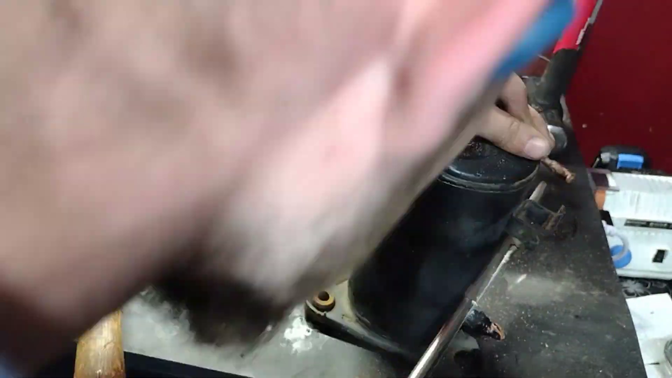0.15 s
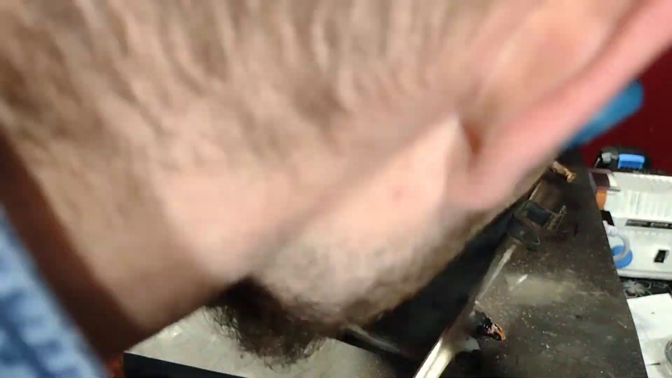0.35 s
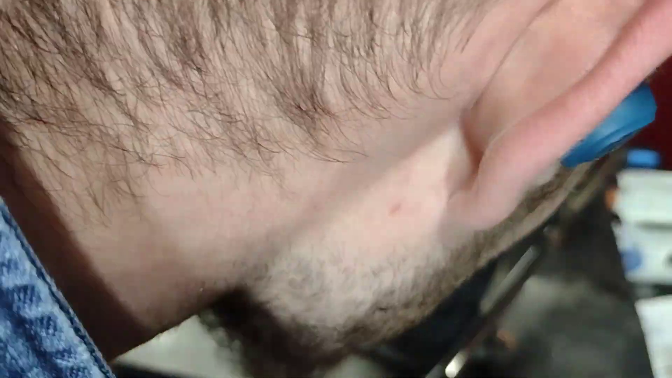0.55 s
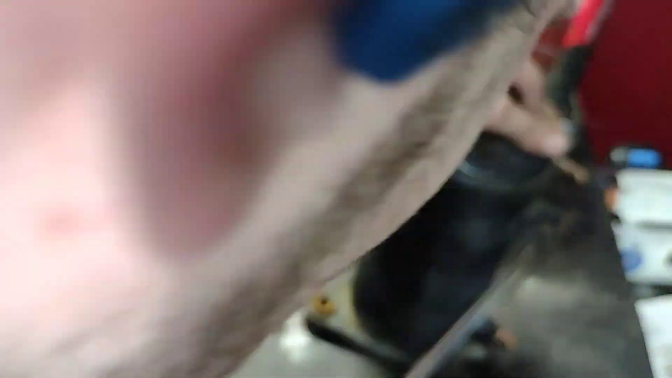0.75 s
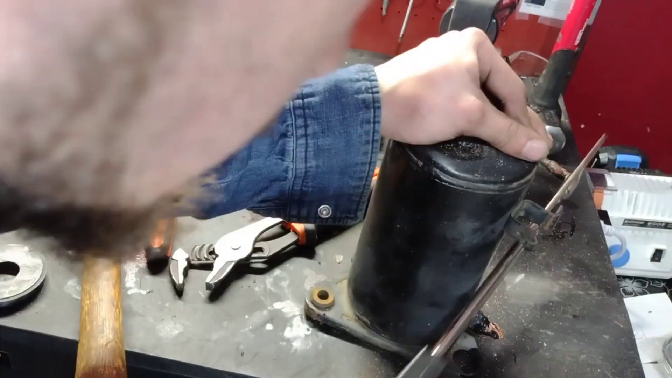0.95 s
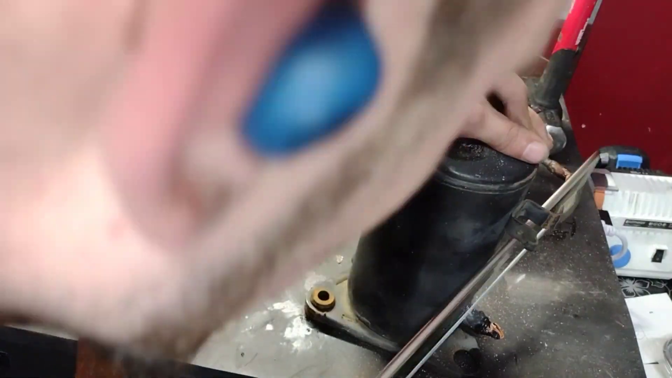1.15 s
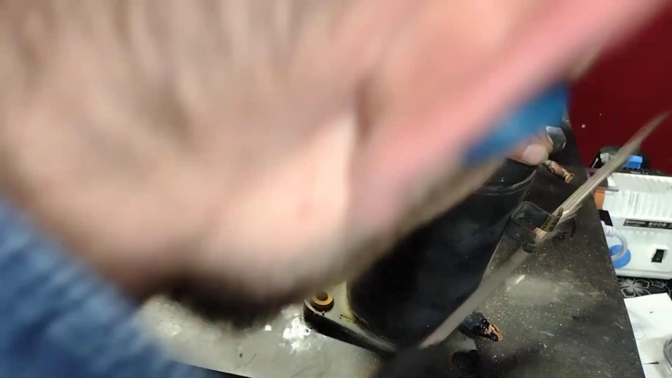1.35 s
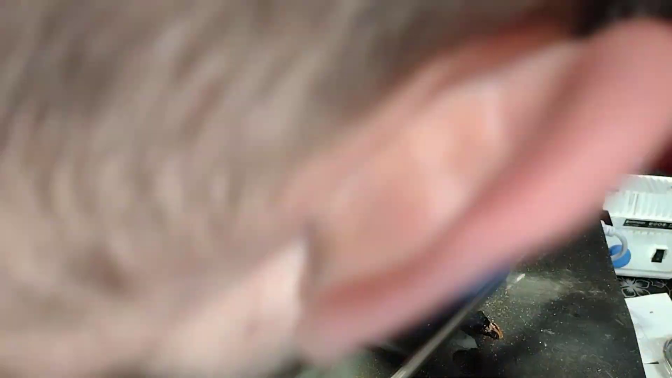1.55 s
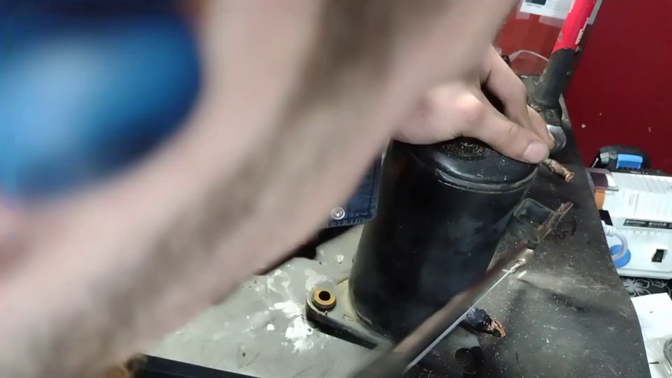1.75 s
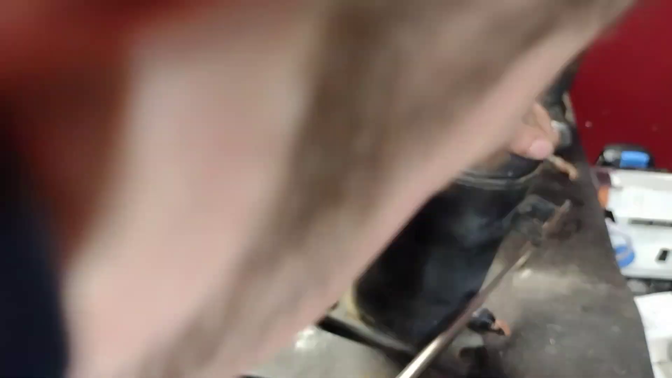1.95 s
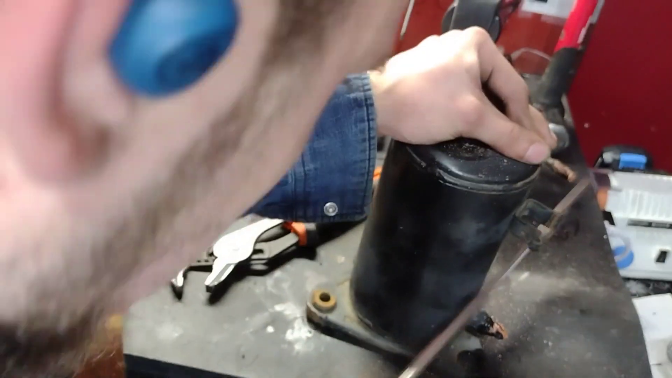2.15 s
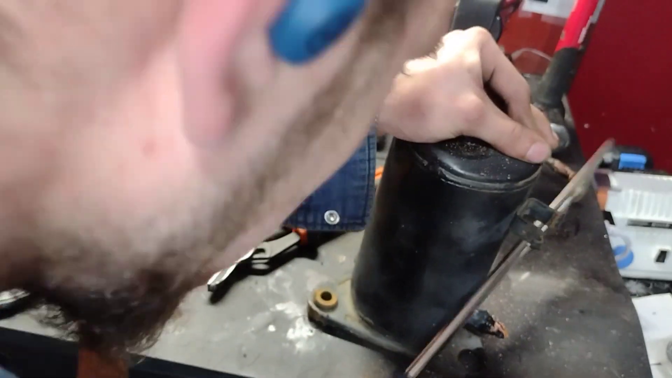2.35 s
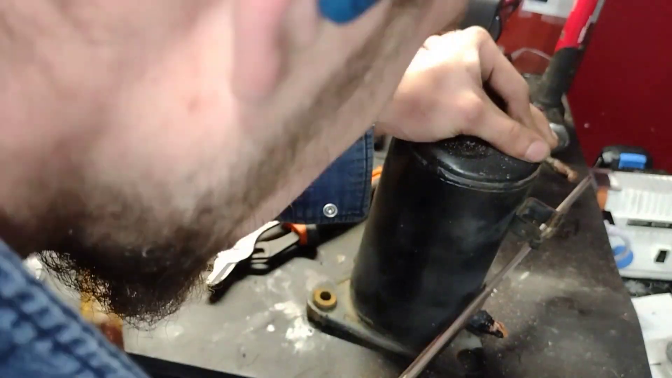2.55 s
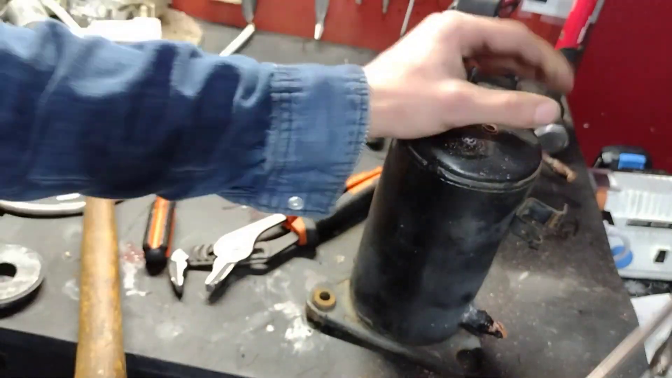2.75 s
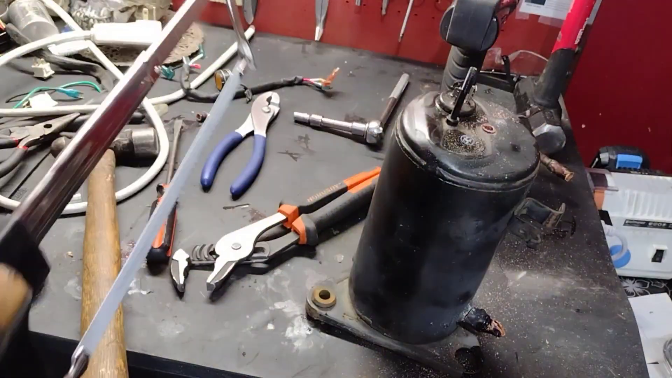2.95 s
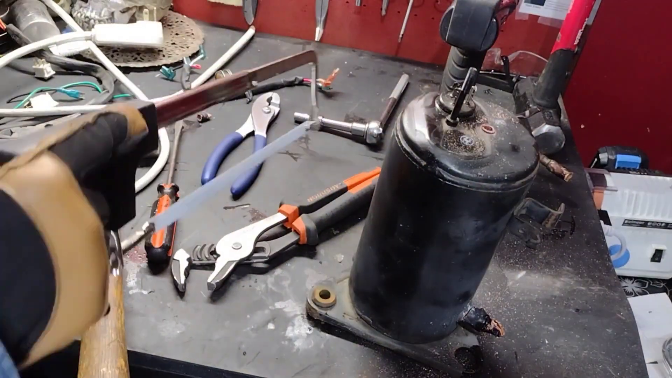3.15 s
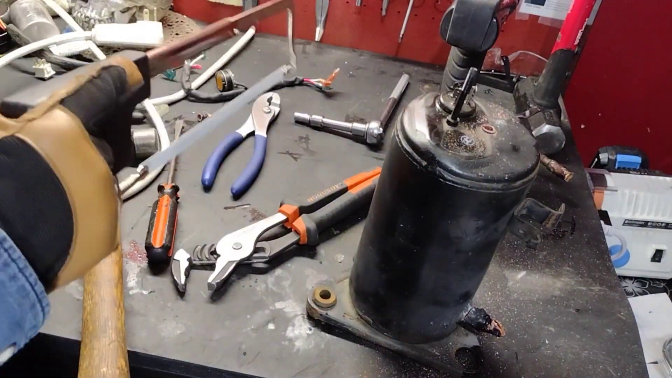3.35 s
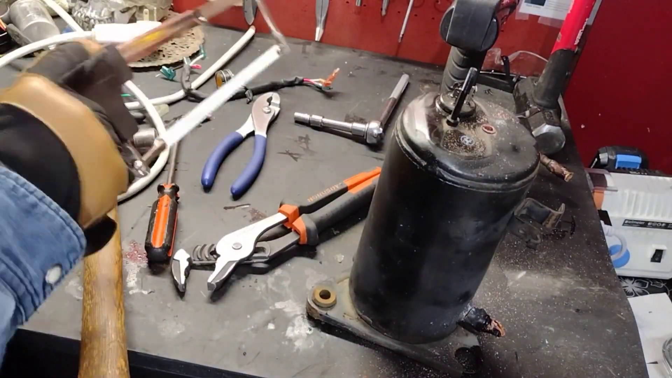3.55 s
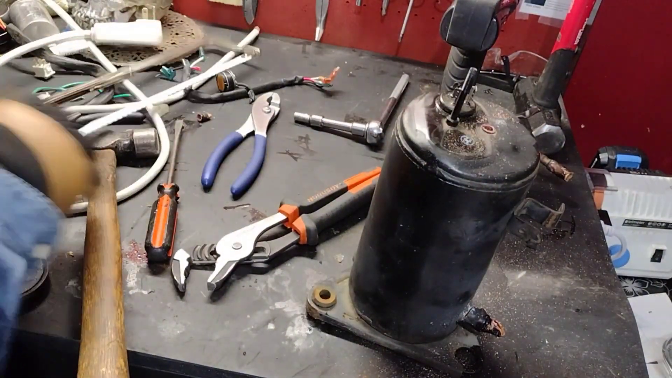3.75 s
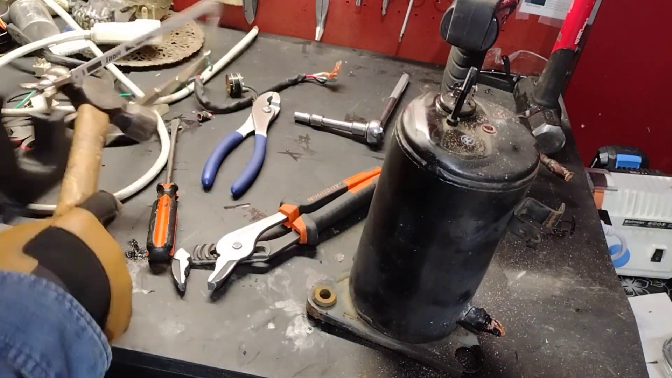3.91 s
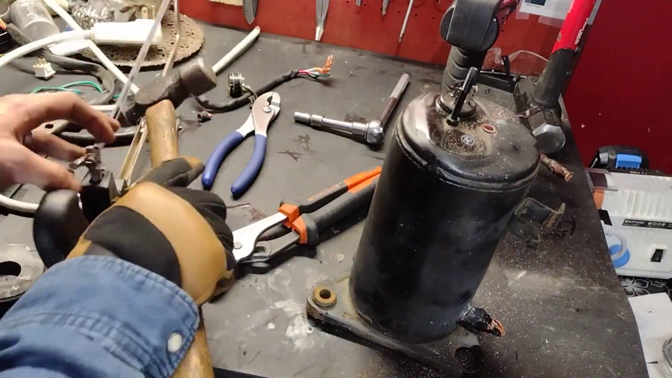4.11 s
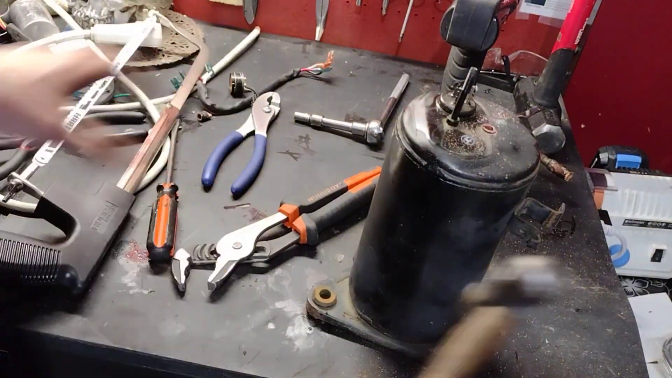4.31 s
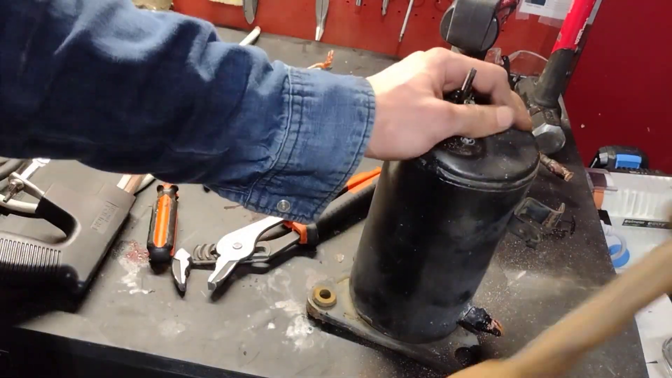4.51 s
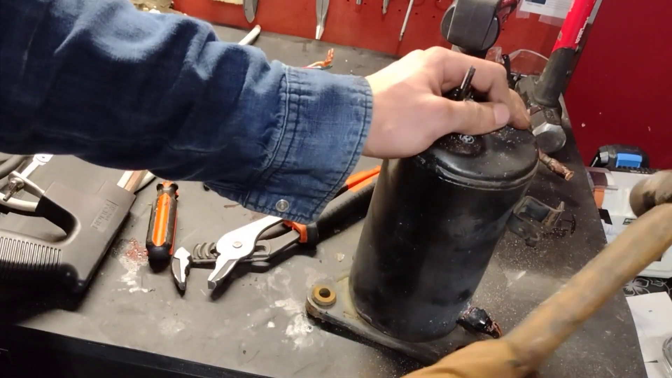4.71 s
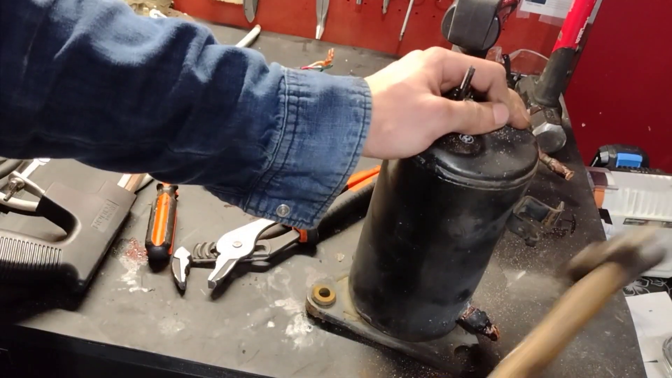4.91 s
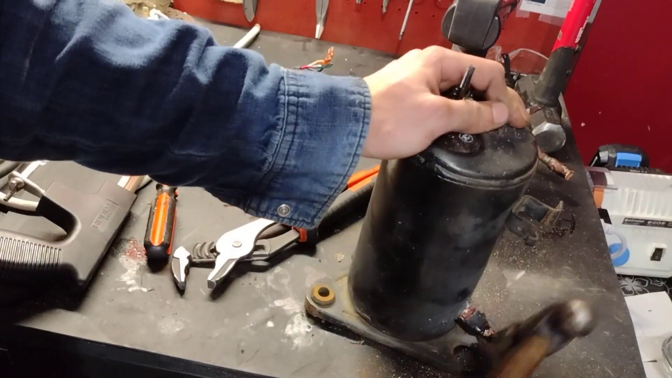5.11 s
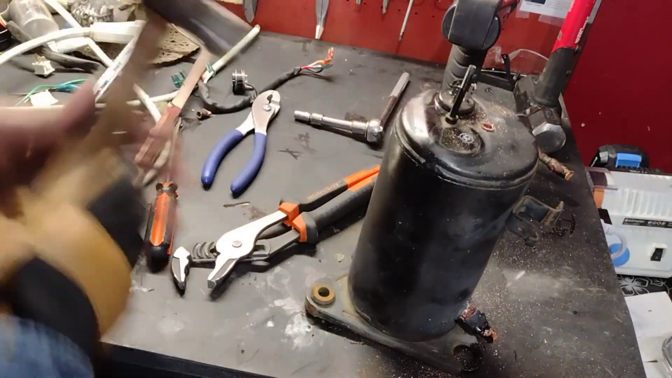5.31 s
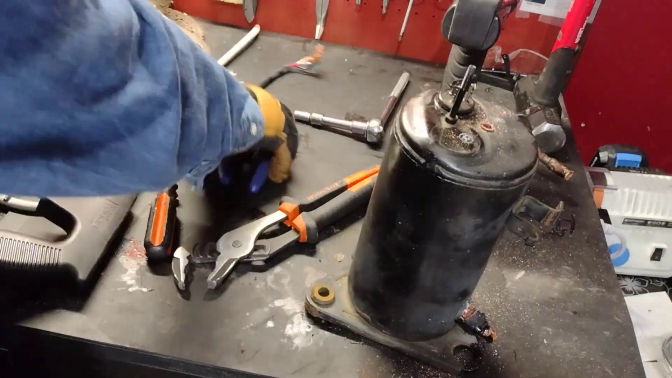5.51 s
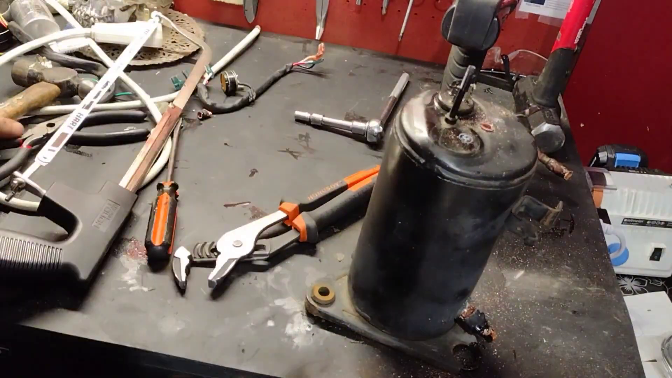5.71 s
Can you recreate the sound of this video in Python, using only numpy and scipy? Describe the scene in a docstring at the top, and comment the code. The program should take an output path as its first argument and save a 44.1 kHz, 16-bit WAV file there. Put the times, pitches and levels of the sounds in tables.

```python
"""A hacksaw chatters on the steel casing of a compressor; tools shift on the bench; a hammer raps six times.
Stick-slip friction and impacts excite the resonant modes of the steel, over occasional bass thumps.
The action is sped up, so each stroke or knock is a short snatch of sound that fades in and out.
Behind them the casing rings thinly, and hands and loose parts rustle in a faint shop hush."""
import sys
import numpy as np
from scipy import signal
from scipy.fft import rfft, irfft
from scipy.io import wavfile

SR = 44100
rng = np.random.default_rng(int(sys.argv[2]) if len(sys.argv) > 2 else 0)


def generate_wav(signal):
    """Clip the signal to [-1, 1] and save it as 16-bit WAV at the path in sys.argv[1]."""
    frames = np.transpose(np.atleast_2d(signal))
    scaled = np.clip(frames, -1, 1) * 32767
    pcm = np.round(scaled).astype(np.int16)
    wavfile.write(sys.argv[1], SR, pcm)


N = 254456

# Saw strokes: peak_s, level_db, rise_ms, fall_ms, weight_db (body over grind), pitch_hz (near 0: no tone)
SAW_STROKES = [(0.004, -16, 16, 11.8, -24, 2919), (0.012, -41, 9, 11, 11.5, 740),
               (0.027, -26, 1.5, 13, -17.5, 0), (0.037, -45.5, 11, 9, 13.5, 562),
               (0.109, -67.5, 14, 13, 18, 563.5), (0.141, -35.5, 9.5, 12.8, -18, 3463),
               (0.189, -64, 4.6, 12, 5, 729), (0.258, -29, 5.9, 11.1, -15, 3940),
               (0.349, -47.5, 9, 15.4, -5, 3477), (0.377, -54, 2, 9.4, -22, 3840),
               (0.531, -61, 7, 26, -5.5, 3736.5), (0.578, -61.5, 4, 9.9, 3, 3124),
               (0.685, -42.5, 10, 6.5, -1, 1445), (0.698, -42, 7, 41, -3, 516),
               (0.728, -19.5, 5.7, 9, -43, 0), (0.75, -29.5, 28.6, 11.5, -4, 460),
               (0.819, -29, 1.3, 3.3, -4, 3344), (0.829, -47, 2.3, 22, 3, 481),
               (0.858, -50, 4.5, 26.4, 0, 2960), (0.926, -57.5, 4.8, 22, -3.5, 3650),
               (1.033, -30.5, 11.1, 4.3, -8, 2601), (1.082, -36.5, 26, 19, -0.8, 0),
               (1.122, -23.5, 17.8, 5.4, -10, 2553), (1.147, -25.5, 14.6, 12.7, -9, 2870),
               (1.19, -19.5, 10.6, 4.3, -51, 2677), (1.231, -29.5, 37, 34, -2, 2945),
               (1.265, -29, 2, 14.3, -2.5, -0.5), (1.312, -24, 15.4, 7.6, -4, 0),
               (1.359, -25.5, 20.7, 6.3, -8.5, -0.5), (1.401, -32.5, 15.5, 9.2, 3.5, 651.5),
               (1.448, -27, 11.8, 15.4, -3.7, 657.5), (1.49, -23, 6.8, 12.4, 3, 646.5),
               (1.542, -25, 11.4, 8.4, -3, 2513.5), (1.581, -59, 21, 11, 22.5, 380.5),
               (1.637, -30.5, 7.6, 1.5, -3.5, 2744), (1.658, -42.5, 33, 3, -2, 5),
               (1.671, -58.5, 6.5, 13, 14.5, 359), (1.735, -66, 7.5, 21, 4.5, 423),
               (1.798, -30.5, 15, 27, 1, 1353.5), (1.822, -21.5, 5.1, 9.5, -15, 3038),
               (1.893, -31.5, 4.7, 27.4, 1, 3744.5), (1.954, -23.5, 5, 13.7, -1, 1.5),
               (1.999, -24, 12, 6.8, -5.5, 2521), (2.028, -22.5, 13, 17.5, 0.5, 0),
               (2.077, -23, 12, 6.4, -9, 662), (2.127, -30, 21.8, 27, -3, 0),
               (2.194, -23, 16.5, 7.4, -1, 0), (2.232, -33.5, 14, 9.1, -3, 1307.5),
               (2.254, -20, 7.3, 12.3, -2, 647), (2.288, -32.5, 41, 15.6, -5, -1.5),
               (2.331, -20.5, 11.8, 8.2, -1, 647.5), (2.353, -27.5, 9.2, 31.6, -7, 647.5),
               (2.375, -35.5, 8.5, 7.7, 13.5, 476), (2.397, -28, 10.5, 6.1, -3.5, 472),
               (2.416, -45.5, 11, 26, 13.5, 483.5), (2.457, -40.5, 2.8, 36, 3, 0),
               (2.478, -45, 2, 34, 4, 1.5), (2.512, -34.5, 5.6, 14.6, -1.5, 0),
               (2.61, -40.5, 11.6, 2.2, 0.8, 0), (2.629, -29, 10.7, 21, -12, 2),
               (2.665, -48.5, 13, 14, -7, 3782)]
# Resonances of blade and casing: centre_hz, width_hz, gain_db
SAW_RESONANCES = [(470.4, 20, -2.5), (695, 27, -1.5), (1376.4, 36, -1.5), (1750, 19, -20),
                  (2585, 59, -10.5), (3470, 57, -7.5), (4680, 76, -15), (4670, 630, -18),
                  (5230, 110, -17.5), (6780, 220, -17.5), (8700, 1100, -21)]
# Broad spectrum under those resonances: frequency_hz, density_db
SAW_SPECTRUM = [(24, -66.5), (40, -43.5), (185, -26.5), (270, -22), (600, -6.5), (1100, -17.5), (2600, -9),
                (4000, -15.5), (11000, -18.5), (15500, -16.5)]


def hacksaw():
    """Stick-slip friction: the teeth catch and release, driving the modes of blade and casing."""
    strokes = timbre(SAW_STROKES, thump_db=-20.5, thump_per_weight=1.0, thump_per_effort=-0.35,
                     hiss_db=-4, hiss_per_effort=0.23, low_tone_db=1.2, high_tone_db=-3.0)
    return contacts(strokes, SAW_RESONANCES, SAW_SPECTRUM, grit_db=2.5, lag_ms=0.42,
                    mode_db=-6.5, scatter_db=5.5, wobble_hz=22.5, crack_db=5.5)


# Hammer blows: peak_s, level_db, rise_ms, fall_ms, weight_db, pitch_hz
HAMMER_BLOWS = [(4.528, -37.5, 7.7, 13.4, 2.5, 5076), (4.63, -22.5, 2.4, 7.4, -3, -3.5),
                (4.74, -21.5, 2.14, 11.4, -0.8, -1), (4.854, -32, 7.4, 13.4, 8, 0),
                (4.974, -35, 12.2, 9.1, 7.5, 2633), (5.087, -42.5, 8.4, 12, 10.5, 2173.5)]
# Resonances of the struck casing: centre_hz, width_hz, gain_db
HAMMER_RESONANCES = [(148.8, 52, 12.5), (364, 85, -1), (1646, 64, 0.5), (2080, 150, -9), (2602, 87, 3),
                     (3100, 92, -11), (4270, 77, -11.5), (5170, 230, -13.5), (6596, 39, -14.5)]
# Broad spectrum of a blow: frequency_hz, density_db
HAMMER_SPECTRUM = [(18, -20.5), (60, 4.5), (145, -24), (400, 8.5), (1430, -11.5), (2600, -7), (7700, -25.5),
                   (16000, -35.5)]


def hammer():
    """Impact and rebound: each blow excites the casing, which settles on the bench with a dull knock."""
    blows = timbre(HAMMER_BLOWS, thump_db=2.2, thump_per_weight=0.05, thump_per_effort=-0.68,
                   hiss_db=-10.5, hiss_per_effort=-0.047, low_tone_db=-1.3, high_tone_db=4.2)
    delay_s, drop_db, edge_ms, weight_db = 0.023, 28.5, 14.7, 12
    settling = [(peak_s + delay_s, level_db - drop_db, edge_ms, edge_ms, weight_db, 0)
                for peak_s, level_db, *_ in HAMMER_BLOWS]
    rebounds = timbre(settling, thump_db=9.4, thump_per_weight=0, thump_per_effort=0.05,
                      hiss_db=-19, hiss_per_effort=0.1, low_tone_db=0, high_tone_db=0)
    return contacts([*blows, *rebounds], HAMMER_RESONANCES, HAMMER_SPECTRUM, grit_db=2.95, lag_ms=0.13,
                    mode_db=0, scatter_db=7.0, wobble_hz=12.0, crack_db=21.5)


# Knocks and scrapes of tools: peak_s, level_db, rise_ms, fall_ms, weight_db, pitch_hz
TOOL_KNOCKS = [(2.717, -80, 5.3, 13, 19.5, 756), (2.807, -68.5, 21, 34, 1.5, 424),
               (2.9, -68.5, 1.1, 1.9, -13, -11.5), (3.088, -75.5, 4.8, 12, 17, 597),
               (3.177, -66.5, 24.5, 3.4, 16.5, 463), (3.193, -61.5, 6.9, 11, 9.5, 572),
               (3.227, -62, 0.78, 2, 5, 0), (3.276, -69.5, 6.6, 13.6, 19, 356),
               (3.395, -64.5, 9, 4, 24, 446), (3.416, -58.5, 8.4, 11.5, 21, 318),
               (3.466, -59, 9.8, 8.7, 5, 2146), (3.495, -75.5, 9.5, 17, 20, 400),
               (3.631, -64.5, 11, 6, -1.2, 413), (3.654, -66.5, 10.7, 12, 5.5, 353.5),
               (3.719, -47.5, 9.6, 31.8, 6, 365), (3.75, -42.5, 3.5, 5.9, 9, 1557),
               (3.857, -44.5, 9, 21, -13, 0), (3.886, -44, 8.8, 33, -22, -7),
               (3.914, -31, 0.9, 15.4, -13.5, 0), (3.947, -43.5, 42, 3.7, -15, 1464),
               (3.977, -59, 14, 15.6, 20.5, 341), (4.04, -80, 39, 27, 4, 1417),
               (4.095, -57, 6.7, 11, -23, 1406), (4.12, -67.5, 8, 10.5, -10.5, 1563),
               (4.205, -50.5, 4.8, 30, 9, 611), (4.231, -43, 11.3, 9.8, 3.5, 811),
               (4.255, -51.5, 15, 4.8, 6.5, 597), (4.432, -66.5, 6, 9.9, 5, 3926),
               (5.177, -82.5, 34, 26, 14, 444), (5.335, -69.5, 28, 12, -21, -4),
               (5.483, -69, 16.4, 27, -13, 7)]
# Resonances of tools and bench: centre_hz, width_hz, gain_db
TOOL_RESONANCES = [(175, 32, 8), (829, 9.3, -11.5), (1470, 65, 0.5), (3370, 31, -2), (3650, 30, -4.5),
                   (4310, 21, -12.5), (4800, 39, -30), (5140, 49, -12), (7430, 118, -13)]
# Broad spectrum of a knock: frequency_hz, density_db
TOOL_SPECTRUM = [(18, -54), (40, -23), (180, -7), (570, 2), (1040, -9.5), (2500, -2), (4300, -12),
                 (16000, -38)]


def tools_and_thumps():
    """Light impacts: shifted tools and the bass thumps are coloured by one set of resonances."""
    knocks = timbre(TOOL_KNOCKS, thump_db=-9.5, thump_per_weight=0.24, thump_per_effort=-0.05,
                    hiss_db=-1, hiss_per_effort=0.16, low_tone_db=1.7, high_tone_db=-1.44)
    return contacts([*knocks, *bass_thumps()], TOOL_RESONANCES, TOOL_SPECTRUM, grit_db=2.1, lag_ms=0.23,
                    mode_db=-5.0, scatter_db=2.0, wobble_hz=25.8, crack_db=-10.5)


# Bass thumps (jolts of the bench, and a bump on the microphone at the end): peak_s, level_db
BASS_THUMPS = [(0.848, -47.5), (1.16, -47.5), (1.37, -40.5), (1.65, -48.5), (2.33, -20), (2.376, -23.5),
               (2.861, -65), (3.086, -61.5), (3.416, -42.5), (3.742, -43), (3.977, -34.5), (4.432, -57),
               (5.557, -58.5), (5.76, -42.5)]


def bass_thumps(rise_ms=10.5, fall_ms=12, thump_db=28):
    """Low-frequency response: a thump is a toneless contact whose bass stands far above its other bands."""
    return [(peak_s, rise_ms, fall_ms, level_db - thump_db, thump_db, 0, 0, 0, -np.inf)
            for peak_s, level_db in BASS_THUMPS]


# Slow drift in the treble hiss of strokes and knocks: time_s, gain_db
HISS_DRIFT = [(0, -3), (0.2, -6), (0.37, 1), (0.55, -28.5), (0.8, 8), (1.1, -5), (1.3, -0.7), (1.65, -3),
              (1.95, 1.5), (2.15, -2.5), (2.4, 0.5), (2.63, 5), (2.85, 8.5), (3.3, -8), (3.47, 0),
              (3.7, -4), (3.9, 5.5), (4.2, -7.5), (4.6, 0.2), (4.9, -4.5), (5.1, 5), (5.77, 3)]


def timbre(events, thump_db, thump_per_weight, thump_per_effort, hiss_db, hiss_per_effort,
           low_tone_db, high_tone_db):
    """Spectral balance follows force: effort and weight set each contact's levels relative to its grind."""
    peak_s, level_db, rise_ms, fall_ms, weight_db, pitch_hz = np.transpose(events)
    effort_db = level_db + 30  # zero at middling force
    pitched, low = pitch_hz > 220, pitch_hz < 1000
    thump = thump_db + thump_per_weight * weight_db + thump_per_effort * effort_db
    body = weight_db - 2.5 * (pitched & low)  # a body that sings on a low tone rattles less
    hiss = hiss_db + hiss_per_effort * effort_db + np.interp(peak_s, *np.transpose(HISS_DRIFT))
    # a low tone rides on the body; a high one stands out more in a light touch
    tone = np.where(low, weight_db + low_tone_db, high_tone_db - 0.09 * effort_db)
    tone[~pitched] = -np.inf
    return np.transpose([peak_s, rise_ms, fall_ms, level_db, thump, body, hiss, pitch_hz, tone])


# Bands of a contact, in the order grind, thump, body, hiss: low_hz, high_hz
CONTACT_BANDS = [(1000, 5500), (40, 220), (220, 1000), (5500, 40000)]


def contacts(events, modes, spectrum, grit_db, lag_ms, mode_db, scatter_db, wobble_hz, crack_db):
    """Source and filter: gritty noise drives the modes, a tone may sing out, and each snatch fades."""
    size = 8192
    out = np.zeros((2, N + 2 * size))
    t_ms = (np.arange(size) - size // 2) / SR * 1000  # zero at the peak
    for peak_s, rise_ms, fall_ms, level_db, thump_db, body_db, hiss_db, pitch_hz, tone_db in events:
        hz, grit = stereo_grit(size, grit_db, lag_ms)
        response = modal_response(hz, modes, spectrum, mode_db, scatter_db)
        grind, thump, body, hiss = (band(grit * response, hz, *edges) for edges in CONTACT_BANDS)
        # the quicker the rise, the harder the first contact cracks in the treble
        crack = undb(crack_db - 1.7 * rise_ms) * np.exp(-((t_ms + 0.91 * rise_ms) / 1.2) ** 2)
        # catching and slipping every few ms flutters grind and hiss together
        stick_slip = undb(0.64 * walk(110, size))
        friction = stick_slip * ((1 + 0.14 * crack) * grind + undb(hiss_db) * (1 + crack) * hiss)
        noise = friction + undb(thump_db) * thump + undb(body_db) * body
        fade_db = -6.5 * np.where(t_ms < 0, abs(t_ms / rise_ms) ** 2.015, abs(t_ms / fall_ms) ** 1.615)
        # extra fading confines the tone to the core of the snatch
        tone = singing_tone(t_ms, pitch_hz, tone_db + 0.2 * fade_db, wobble_hz, lag_ms)
        start = int(peak_s * SR) + size // 2
        out[:, start:start + size] += (noise + tone) * undb(level_db + fade_db + 0.84 * walk(40, size))
    return out[:, size:size + N]


def modal_response(hz, modes, spectrum, mode_db, scatter_db):
    """Modal superposition: the contact point moves, so each mode is excited differently every time."""
    response = undb(along(spectrum, hz)) + 0j
    for centre_hz, width_hz, gain_db in modes:
        strength, detune = rng.standard_normal(2)
        offset_hz = hz - centre_hz * (1 + 0.018 * detune)
        response += undb(gain_db + mode_db + scatter_db * strength) / (1 + 2j * offset_hz / width_hz)
    # countless small partials form a fine comb, flatter in the treble
    comb_db = 6.5 * walk(260, len(hz)) / (1 + hz / 7000)
    return response * undb(comb_db + 2.3 * walk(40, len(hz)))


def singing_tone(t_ms, pitch_hz, level_db, wobble_hz, lag_ms):
    """Random modulation: one partial wavers in pitch and level and reaches the right channel later."""
    drift_cycles = wobble_hz * np.cumsum(walk(24, len(t_ms))) / SR
    delay_ms = lag_ms * pitch_hz / (pitch_hz + 900)
    cycles = pitch_hz * np.array([t_ms, t_ms - delay_ms]) / 1000 + drift_cycles + rng.random()
    # make up for the cancellation that the delay causes in the mean of the channels
    mono_gain = max(abs(np.cos(np.pi * pitch_hz * delay_ms / 1000)), 0.4)
    amplitude = undb(level_db + 5.4 * walk(36, len(t_ms))) * np.sqrt(2) / mono_gain
    return amplitude * np.sin(2 * np.pi * cycles)


# Thin partials of the steel shell: pitch_hz, gain_db, t60_s
SHELL_PARTIALS = [(1740, -13.5, 0.42), (1790, -2, 1.15), (1880, -6.5, .6), (2057, -15.5, .5),
                  (3820, -15.5, .5), (4350, -19, .5), (7540, -20, 0.5)]
# Knocks that leave the shell ringing: start_s, level_db
SHELL_KNOCKS = [(0.04, -65), (0.271, -65), (0.386, -67.5), (4.64, -63), (4.76, -74), (4.88, -68),
                (5.101, -66.5)]


def casing_ring():
    """Damped free vibration: the shell's partials flutter, decay and are faded out by 0.13 s."""
    out, age_s = np.zeros(N), np.arange(SR // 5) / SR
    fade = np.clip(age_s / 0.0086, 0, 1) * np.clip((0.13 - age_s) / 0.037, 0, 1)
    for start_s, level_db in SHELL_KNOCKS:
        start = int(start_s * SR)
        for pitch_hz, gain_db, t60_s in SHELL_PARTIALS:
            decay_db = level_db + gain_db - 60 * age_s / t60_s + 3.0 * walk(10, len(age_s))
            partial = np.sin(2 * np.pi * (pitch_hz * age_s + rng.random()))
            out[start:start + len(age_s)] += undb(decay_db) * fade * partial
    return out


# Spectrum of the shop hush: frequency_hz, density_db
HUSH_SPECTRUM = [(30, -4.5), (103, -7), (303, -5.5), (760, -10.5), (1350, -11), (2500, -16.5), (4910, -21),
                 (9000, -26), (16000, -30)]
# Handling noise of hands and loose parts: time_s, rumble_db, rustle_db
HANDLING_LEVELS = [(0, -65, -77), (0.651, -66.5, -76.5), (0.999, -60.5, -73), (1.699, -51, -69.5),
                   (2.6, -54.5, -75.5), (2.95, -72.5, -78.5), (3.5, -69, -81), (4.0, -64.5, -75),
                   (4.5, -73.5, -75), (4.7, -63, -77), (5.1, -60.5, -79.5), (5.401, -76, -79),
                   (5.77, -68.5, -73.5)]


def handling_noise():
    """Amplitude-modulated noise: a dull rumble and a bright rustle flicker and swell with the handling."""
    hz, grit = stereo_grit(2 ** 18, grit_db=1.8, lag_ms=0.033)
    hush = grit * undb(along(HUSH_SPECTRUM, hz))
    time_s, rumble_db, rustle_db = np.transpose(HANDLING_LEVELS)
    t = np.arange(N) / SR
    rumble_gain = undb(np.interp(t, time_s, rumble_db) + 1.5 * walk(150, N))
    rustle_gain = undb(np.interp(t, time_s, rustle_db) + walk(130, N))
    return band(hush, hz, 58, 810)[:, :N] * rumble_gain + band(hush, hz, 1600, SR)[:, :N] * rustle_gain


# Likeness of the two channels: frequency_hz, coherence
CHANNEL_COHERENCE = [(100, 0.94), (300, 0.96), (700, 0.54), (1500, 0.38), (4000, 0.25), (15000, 0.072)]
# Level difference between the channels: frequency_hz, left_minus_right_db
CHANNEL_BALANCE = [(100, 0.5), (400, 1), (1000, 3.5), (2400, 1), (5000, 1.5), (15000, -0.04)]


def stereo_grit(size, grit_db, lag_ms):
    """Partial coherence: spectra of dense, uneven grains at two nearby points, the right one later."""
    hz = np.arange(size // 2 + 1) * SR / size
    grains = rng.standard_normal((2, size)) * undb(grit_db * rng.exponential(size=size))
    left, independent = rfft(grains)
    coherence = along(CHANNEL_COHERENCE, hz)
    delay_s = lag_ms / 1000 * hz / (hz + 900)  # nearby points share the bass; the lag shows higher up
    right = (coherence * left + np.sqrt(1 - coherence ** 2) * independent) * np.exp(-2j * np.pi * hz * delay_s)
    pan = undb(along(CHANNEL_BALANCE, hz) / 2)
    return hz, np.array([left * pan, right / pan])


def band(spectra, hz, low_hz, high_hz):
    """Band-pass filtering: a soft-edged band as a waveform, with unit rms for the mean of the channels."""
    wave = irfft(spectra / np.sqrt((1 + (low_hz / (hz + 1)) ** 8) * (1 + (hz / high_hz) ** 8)))
    return wave / np.sqrt(np.mean(wave.mean(0) ** 2))


def walk(count, size):
    """Random fluctuation: a line through count random levels, with a spread near 1."""
    return 0.98 * np.interp(np.arange(size), np.linspace(0, size, count), rng.standard_normal(count))


def along(table, hz):
    """Interpolation of a (frequency_hz, value) table on a logarithmic frequency axis."""
    frequency_hz, values = np.transpose(table)
    return np.interp(np.log(hz + 1), np.log(frequency_hz), values)


def undb(db):
    """Decibels as an amplitude ratio."""
    return 10 ** (np.asarray(db) / 20)


def scene():
    """Superposition: the sound pressures of all the sources add."""
    return hacksaw() + tools_and_thumps() + hammer() + casing_ring() + handling_noise()


def record(dry):
    """Soft saturation rounds the loudest peaks; a steep low-pass filter cuts the top."""
    rounded = 1.3 * np.tanh(dry / 1.3)
    return signal.sosfilt(signal.ellip(12, 0.2, 90, 15950, fs=SR, output="sos"), rounded)


dry = scene()
out = record(dry)
generate_wav(out)
```